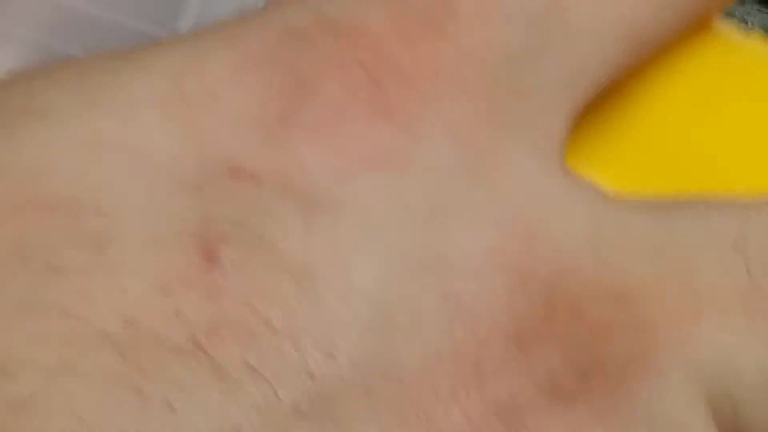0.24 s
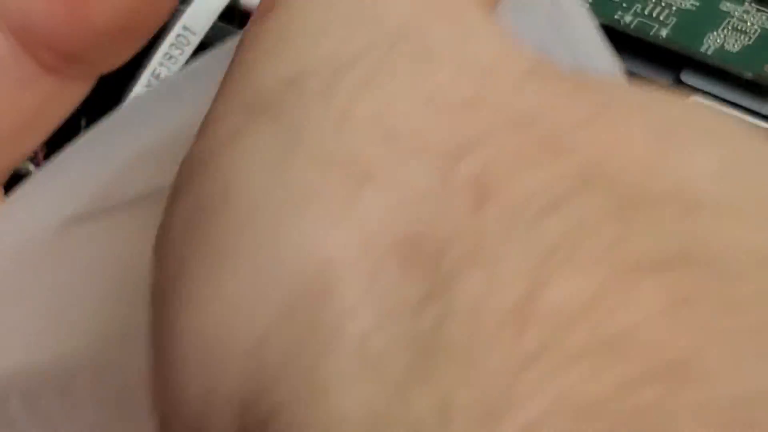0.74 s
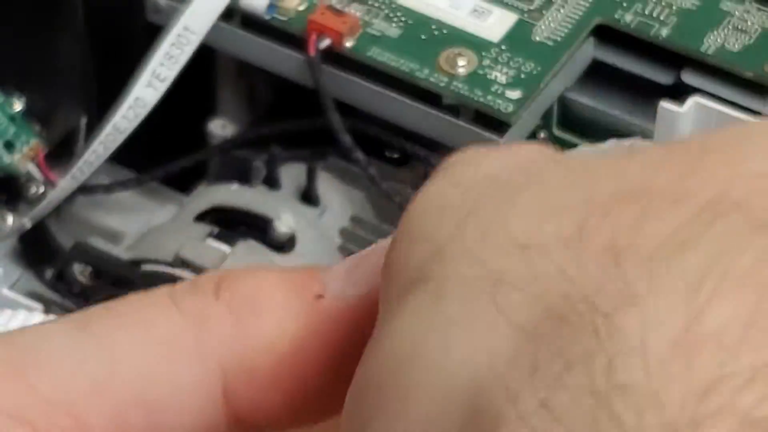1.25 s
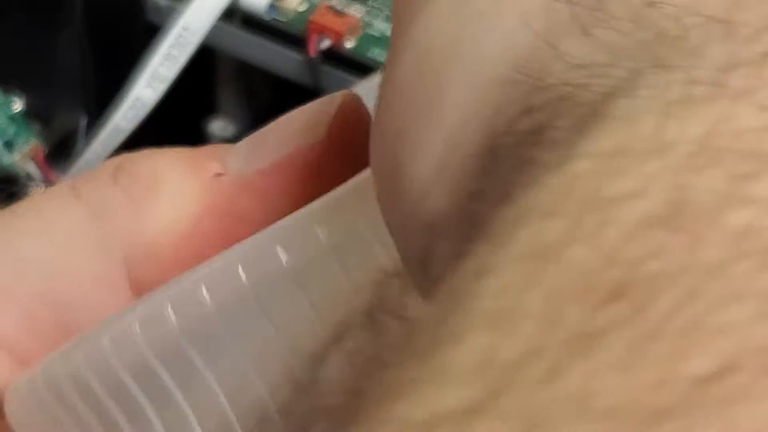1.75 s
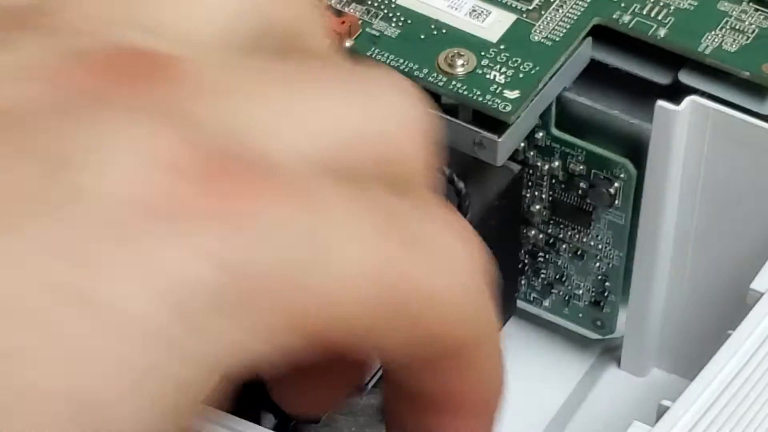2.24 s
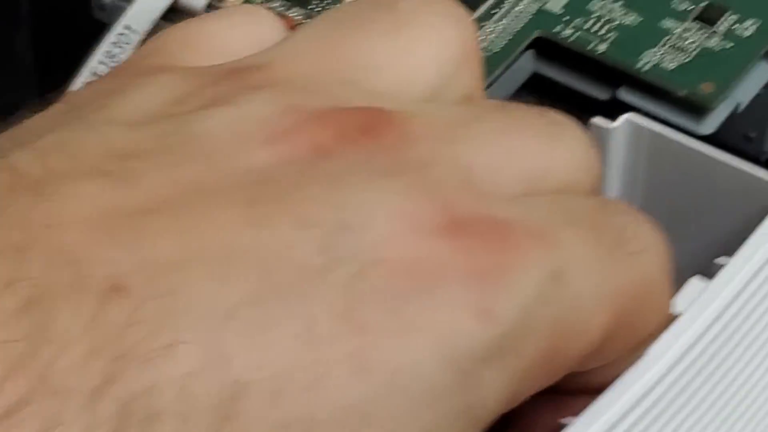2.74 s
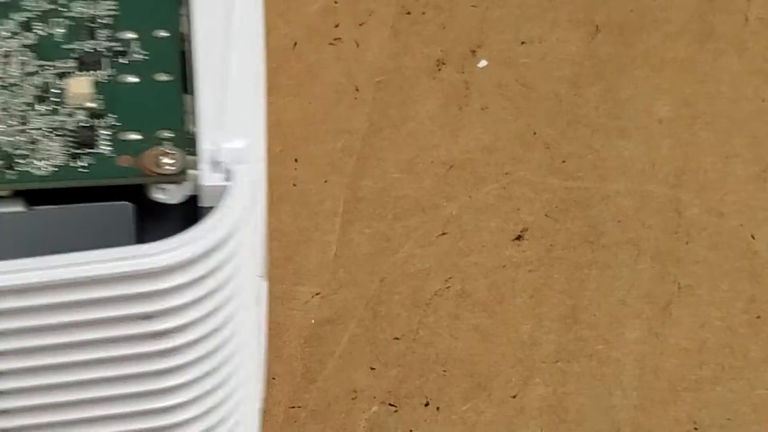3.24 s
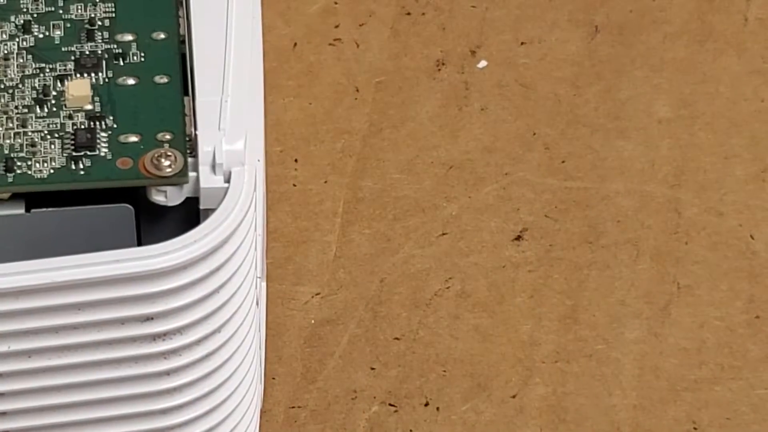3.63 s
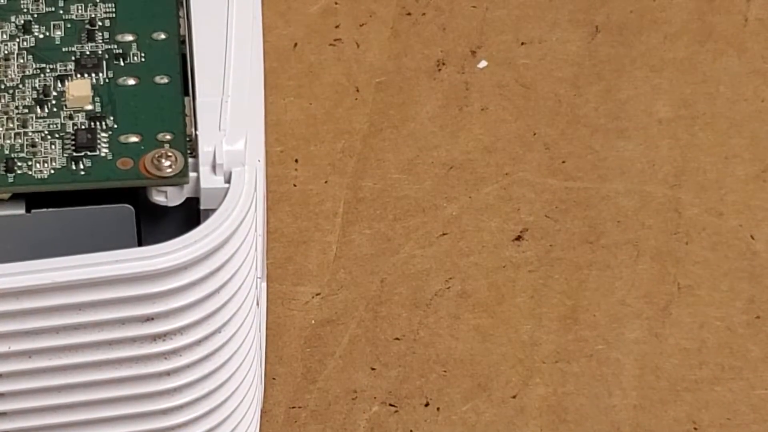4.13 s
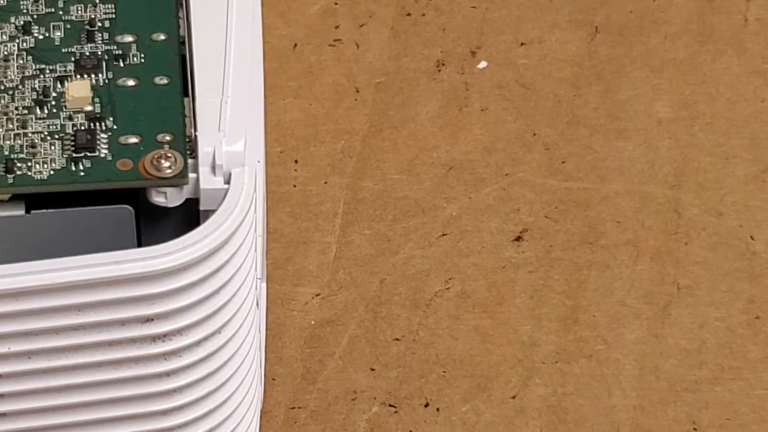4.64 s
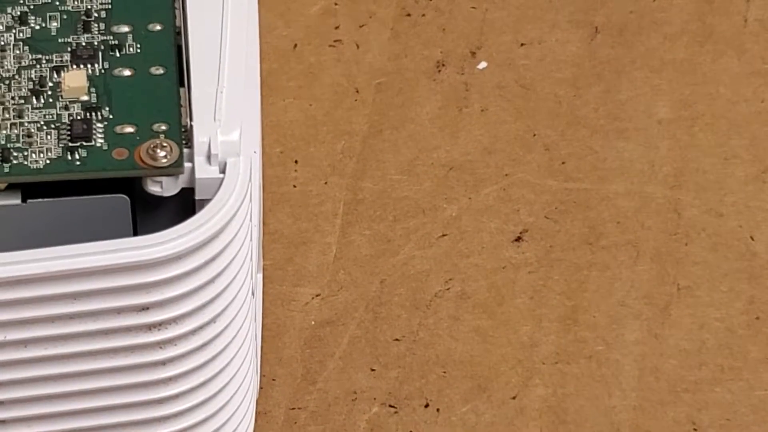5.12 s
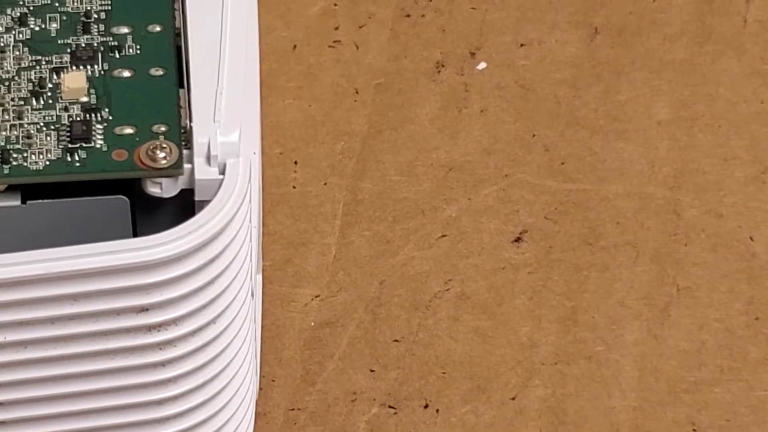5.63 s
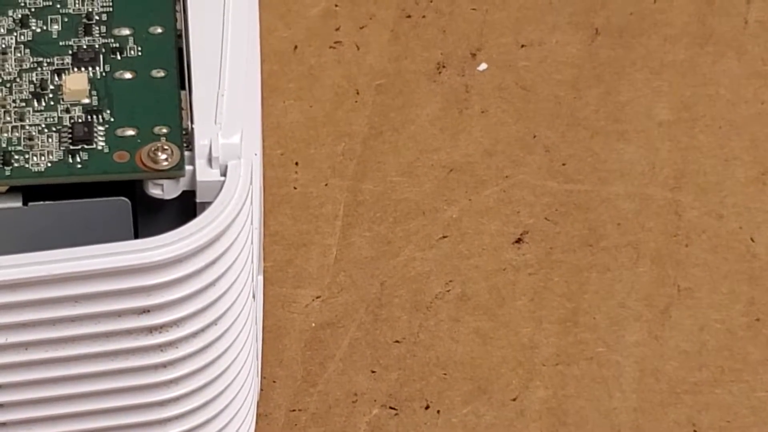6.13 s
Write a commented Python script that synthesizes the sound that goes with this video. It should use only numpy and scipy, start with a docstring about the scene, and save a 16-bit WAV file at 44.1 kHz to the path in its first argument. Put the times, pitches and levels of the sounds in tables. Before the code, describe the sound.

A squeezed plastic air blower puffs hissy bursts into an open electronics case, with plastic knocks and creaks over a low hum.

```python
"""A low machine hum and a faint hiss fill a small room. Close by, a plastic bellows blower puffs three
times deep into an open electronics case: each jet hisses over the parts, then the bellows draws air
back in more softly. Handled plastic scuffs, pops and creaks around the puffs, and a flurry of knocks
and fingertip taps follows in the pause. From 4.7 s four brighter puffs blow over the rim of the case,
with a few more knocks, while the hum sinks."""
import sys
import numpy as np
from scipy import signal
from scipy.fft import rfft, irfft
from scipy.io import wavfile
from scipy.ndimage import uniform_filter1d

SR = 44100
rng = np.random.default_rng(int(sys.argv[2]) if len(sys.argv) > 2 else 0)


def wrap_up_sound(samples):
    """Save the sound to the file named by the first command line argument, as 16-bit audio."""
    columns = np.atleast_2d(samples).T
    # keep every value between -1 and 1, then stretch to whole-number steps
    tamed = np.clip(columns, -1, 1)
    steps = np.round(tamed * 32767).astype(np.int16)
    wavfile.write(sys.argv[1], SR, steps)


N = 281137
TIME = np.arange(N) / SR
TOP_HZ = 15750  # upper edge of the sound
SHADE_HZ = 3000  # hand and case shade the treble of knocks and creaks above this


def undb(db):
    """Decibels to gain."""
    return 10 ** (np.asarray(db) / 20)


def rms(x):
    """Root mean square."""
    return np.sqrt(np.mean(x ** 2)) + 1e-12


def bins(size):
    """Frequencies of a spectrum of this many samples."""
    return np.maximum(np.fft.rfftfreq(size, 1 / SR), 1)


def colour(points, hz):
    """Read a (frequency [Hz], level [dB]) curve at these frequencies."""
    point_hz, db = np.transpose(points)
    return np.interp(np.log(hz), np.log(point_hz), db)


def causal(db, size):
    """Tightest pulse with this spectrum (minimum phase)."""
    cepstrum = irfft(np.log(undb(db)), size)
    cepstrum[1:size // 2] *= 2
    cepstrum[size // 2 + 1:] = 0
    return irfft(np.exp(rfft(cepstrum)), size)


def resonance(hz, centre_hz, q):
    """Response of one damped resonance, 1 at its centre."""
    return 1 / (1 + 1j * q * (hz / centre_hz - centre_hz / hz))


def walk(per_s):
    """Smooth random modulation of unit rms, with this many new values a second."""
    hold = int(SR / per_s)
    steps = np.repeat(rng.standard_normal(N // hold + 2), hold)
    slewed = uniform_filter1d(uniform_filter1d(steps, hold), hold)[:N]
    return slewed / rms(slewed)


def sides(pan_db):
    """Stereo gains for a pan, given as left minus right in dB."""
    return undb(np.vstack([pan_db, -pan_db]) / 2)


def add(out, s, sound):
    """Mix a stereo sound in at a time."""
    start = max(int(s * SR), 0)
    out[:, start:start + sound.shape[1]] += sound[:, :N - start]


def diffuse(size, wide_hz=600, bass_width=.12):
    """Stereo noise from all around: alike in the bass, unrelated in the treble."""
    hz = bins(size)
    mid, side = rfft(rng.standard_normal((2, size)))
    width = np.hypot(hz ** 2, bass_width * wide_hz ** 2) / np.hypot(hz ** 2, wide_hz ** 2)
    return irfft(np.array([mid + width * side, mid - width * side]) / np.sqrt(1 + width ** 2), size)


def steady(points, db):
    """Bed of diffuse noise with a given colour and rms level."""
    noise = irfft(rfft(diffuse(N)) * undb(colour(points, bins(N))), N)
    return undb(db) * noise / rms(noise)


def scatter(t60_s, size):
    """Dense fading reflections of unit energy, different on each side."""
    tail = diffuse(size) * undb(-60 * np.arange(size) / SR / t60_s)
    return tail / np.sqrt(np.sum(tail ** 2, axis=1, keepdims=True))


def machine_hum(waver_db=2.0, rumble_db=-35.5):
    """A machine drones in wavering low tones, the lowest two beating, over a rumble that swells along."""
    # tones of the machine: (frequency [Hz], rms level before the swell [dB], pitch wander [share])
    tones = [(52.5, -38, 0.0024), (59.54, -35, 0.01456), (107.05, -43.5, 0.0184), (119.1, -50, 0.00588),
             (171, -55.5, 0.0042)]
    # swell of the whole drone: (time [s], gain [dB])
    swell_curve = [(0, .5), (.95, 1.5), (1.3, -2), (2.3, -4), (2.85, 0), (4.1, 0), (4.8, -2.5), (5.3, -6),
                   (6.37, -6.3)]
    # colour of the rumble: (frequency [Hz], level [dB])
    rumble_colour = [(15, -50), (30, -30), (44, -11.5), (70, -8), (90, 0.5), (125, -9), (145, -22),
                     (250, -17), (350, -24.5), (700, -29), (2000, -60), (5000, -90)]
    swell = undb(np.interp(TIME, *np.transpose(swell_curve)))
    drone = 0
    for hz, db, wander in tones:
        phase = 2 * np.pi * np.cumsum(hz * (1 + wander * walk(9))) / SR
        drone += np.sqrt(2) * undb(db + waver_db * walk(10)) * np.sin(phase)
    return (drone + steady(rumble_colour, rumble_db)) * swell


def room_tone(level_db=-58.3):
    """The quiet, even hiss of the room."""
    # colour of the hiss: (frequency [Hz], level [dB])
    hiss_colour = [(200, 0), (500, -1), (1000, -6), (2000, -7), (4000, -8.5), (6300, -12.5), (8000, -18),
                   (15700, -17.5)]
    return steady(hiss_colour, level_db)


def stroke(attack_s, length_s, level_db, sag_db_per_s, release_db_per_s, ease_s=.009, size=16384):
    """Envelope of the air flow: it builds up, sags as the pressure is spent and dies away."""
    t = np.arange(size) / SR
    rise = np.sin(np.pi / 2 * np.minimum(t / attack_s, 1)) ** 3
    held_s = np.maximum(t - attack_s, 0)
    released_s = ease_s * np.logaddexp(0, (t - length_s) / ease_s)
    return rise * undb(level_db - sag_db_per_s * held_s - release_db_per_s * released_s)


def jet(flow, over_rim, tilt_db, cavity_hz, cavity_db, width_hz, rise_db_per_s,
        scatter_db=3, swing_s=.18, glide=.12, flap_db=2, flutter_db=1.35):
    """Turbulent air at the nozzle, coloured by the cavity it hits and scattered by the parts around."""
    # hiss deep inside the case: (frequency [Hz], level [dB])
    inside_colour = [(120, -38), (220, -16), (400, -7.5), (600, 0), (1000, -5.5), (1350, 5.5), (1900, 3),
                     (2450, 1.5), (3100, 3), (4300, 1), (5300, -3.5), (6500, -2.5), (8000, -9.5),
                     (9500, -5), (11700, -3), (15700, -13)]
    # stereo balance of that hiss: (frequency [Hz], left minus right [dB])
    inside_pan = [(200, 7), (700, 13.5), (1300, 1.5), (4400, 1), (15000, -1)]
    # hiss over the rim: (frequency [Hz], level [dB])
    rim_colour = [(120, -61), (200, -60), (327, -43), (393, 8), (517, 3), (643, 10), (1030, 6), (1290, 6.5),
                  (1440, -0.5), (2110, 3.5), (3300, -3.5), (4400, 5), (6700, 3), (7800, 0), (9500, 3),
                  (12700, 3), (14200, -2.5), (15700, -14.5)]
    size = len(flow)
    hz, t = bins(size), np.arange(size) / SR
    if over_rim:
        shape_db, pan_db = colour(rim_colour, hz), 2.5
        sizzle_hz, sizzle_db = 14900, 12
        lag_s = np.array([[0], [1.35e-4]])  # the nearer side hears the jet first
    else:
        shape_db, pan_db = colour(inside_colour, hz), colour(inside_pan, hz)
        sizzle_hz, sizzle_db = 15000, 13
        lag_s = np.array([[7e-5], [0]])
    shape_db += tilt_db * np.log2(np.clip(hz, 500, TOP_HZ) / 1000)
    shape_db += sizzle_db * np.exp(-((hz - sizzle_hz) / 1600) ** 2)  # the narrow nozzle sizzles
    paths = np.exp(-2j * np.pi * hz * lag_s) + undb(scatter_db) * rfft(scatter(t60_s=.07, size=size))
    eddies = rfft(diffuse(size))  # further along the jet, they hiss on their own
    air = (rfft(rng.standard_normal(size)) * paths + eddies) * undb(shape_db) * sides(pan_db)
    treble = irfft(air.mean(axis=0) * (hz > 9000) * (hz < TOP_HZ))  # the flow sets this band's level
    # the cavity glides up, and sings more or less, as the nozzle swings towards it or away
    from_mid_s = np.minimum(t, swing_s) - swing_s / 2
    early, late = (irfft(air * np.exp(-2 * ((hz - centre_hz) / width_hz) ** 2))
                   for centre_hz in (cavity_hz * (1 - glide / 2), cavity_hz * (1 + glide / 2)))
    cavity = early + (late - early) * (from_mid_s / swing_s + .5)
    flapping_db = flap_db * walk(35)[:size]  # the jet flaps across the cavity's mouth
    boost_db = cavity_db + rise_db_per_s * from_mid_s + flapping_db
    hiss = irfft(air) + cavity * (undb(boost_db) - 1)
    return hiss / rms(treble) * flow * undb(flutter_db * walk(80)[:size])


def bellows(over_rim_from_s=4, pause_s=.056):
    """Each squeeze blows a puff; the bellows springs back and draws a softer breath through the nozzle."""
    # squeezes: (time [s], attack [s], length [s], treble level [dB], sag [dB/s], tilt [dB/octave],
    # cavity note [Hz], cavity boost [dB], cavity width [Hz], cavity rise [dB/s],
    # refill length [s], refill treble level [dB], refill tilt [dB/octave])
    squeezes = [ (0.243, .078, .135, -35.7, 35, -1.8, 2950, 6.5, 500, 40, .1, -46.5, 0),
                (1.103, 0.023, 0.13, -22.5, 20, 2, 3500, -0.5, 900, 19, 0.11, -48.5, 4),
                (1.629, 0.078, 0.18, -38, 45, -0.9, 2970, -0.5, 910, -5, 0.064, -46, -0.5),
                (4.684, 0.077, 0.22, -23, 90, 4.5, 5150, -0.5, 1600, 4, 0.1, -45.5, 5),
                (5.2, 0.064, 0.15, -22.3, 10, 5, 5400, 2, 1200, 65, 0.15, -45.5, 5),
                (5.645, 0.055, 0.135, -22.5, 135, 4, 5200, 4.5, 1200, -16, 0.11, -49, 3),
                (6.052, 0.071, 0.14, -24, 117, 2.5, 5260, 5, 1300, 10, .17, -53, 3.5)]
    out = np.zeros((2, N))
    for s, attack_s, length_s, db, sag, tilt, *cavity, refill_s, refill_db, refill_tilt in squeezes:
        over_rim = s > over_rim_from_s
        puff = stroke(attack_s, length_s, db, sag, release_db_per_s=315)
        add(out, s, jet(puff, over_rim, tilt, *cavity))
        refill = stroke(.07, refill_s, refill_db, sag_db_per_s=0, release_db_per_s=150)
        breath = jet(refill, over_rim, refill_tilt,
                     cavity_hz=5230, cavity_db=4.5, width_hz=4000, rise_db_per_s=0)
        add(out, s + length_s + pause_s, breath)
    return out


def scuffs(grain_db=2.5):
    """Skin catches and slips on the plastic in short, grainy swells."""
    # finger slides: (centre time [s], length [s], level [dB])
    slides = [(0.462, 0.042, -45), (3.47, 0.06, -51), (3.862, 0.08, -51), (4.2, 0.15, -56)]
    # muffled colour of the friction: (frequency [Hz], level [dB])
    friction_colour = [(200, -12), (720, 0), (1300, -6), (2500, -8), (4500, -15), (7000, -22), (9000, -31),
                       (15000, -36)]
    swell = sum(undb(db) * np.exp(-2 * ((TIME - s) / length_s) ** 2) for s, length_s, db in slides)
    return swell * undb(grain_db * walk(280)) * steady(friction_colour, 0)


def shell_ring(hz, t, strike_db, detune_share=.0084, stereo_spread=.16):
    """The plastic shell rings; every place that is struck drives its modes differently."""
    # modes of the shell: (frequency [Hz], level [dB], time to fall 60 dB [s])
    shell_modes = [(175, -20, .2), (212, -14, .18), (257, -18, .2), (399, -9, .17), (430, -11, .25),
                   (620, -6, .07), (830, -7, .1), (1315, -3, .1), (1430, -2, .12), (1600, -1, .09),
                   (1700, -2, .09), (1960, 3, .055), (2240, 4, .05)]
    mode_hz, mode_db, t60_s = np.transpose(shell_modes)[:, :, None]
    detune = 1 + detune_share * rng.standard_normal(mode_hz.shape)
    drive_db = mode_db + np.interp(mode_hz, hz, strike_db)
    modes = undb(drive_db - 60 * t / t60_s) * np.sin(2 * np.pi * mode_hz * detune * t)
    polarity = rng.choice([-1, 1], len(modes))
    ring = (polarity + stereo_spread * rng.standard_normal((2, len(modes)))) @ modes
    return np.sqrt(2) * ring / np.linalg.norm(ring)


def knocks(thud_hz=450, snap_hz=3500, note_octaves=.25, note_cycles=26,
           rattle_db=2, rattle_top_hz=5000, shell_db=-5.5, hollow_db=-4, size=16384):
    """Each blow is a sharp pulse, a brief rattle in the case, the shell's ring and a hollow wall note."""
    # pops and knocks of plastic: (time [s], relative level [dB], thud [dB], snap [dB], ring [dB],
    # note [Hz], note boost [dB], left minus right [dB])
    blows = [ (0.511, -24, 3, 12, -1.5, 800, 13, 4.5), (0.748, -38.5, 4, 3, 4, 820, 10, 5.5),
             (0.787, -45, 6, 0, 4, 744, 11, 6), (0.985, -55, -20, 15, -7, 4300, 5, 13),
             (0.990, -46, 22, -15, -5, 230, 8, 2), (1.11, -19, 16, 27, -2, 4300, 5, 1.5),
             (1.688, -39, 12, -4, 8, 696, 13, 3), (2.325, -51, -3, 5, 10, 720, 6, 3.5),
             (3.348, -20, 4.5, -6, -6, 900, 2, 4.5), (3.363, -41, 0, -15, 11, 2150, 3, 1),
             (3.536, -18, 13.5, -1, -1.5, 1484, 5, 3.5), (3.541, -26.5, 3, -17, 5.5, 1620, 4, -2),
             (3.556, -36, -3, -18, 11, 1750, 5, 0), (3.605, -27, 13, -6, 1.5, 1330, 5, 3),
             (3.615, -34.5, 18, -3, 10, 1420, 7, 2), (4.112, -27.5, 8.5, -14, -4.5, 2270, 5, -2),
             (4.428, -21.5, 6, -8, -4, 2080, 3, 0.5), (5.123, -34, 5, -12, -3, 1500, 2, 1),
             (5.256, -35.5, -7, -30, -15, 1550, 5, 3), (5.555, -46, -15, 10, -5, 4000, 10, 2),
             (5.598, -41, 7, 1, -2, 770, 5, 2), (5.652, -23.5, -2, -8, -6, 1940, 4, 5),
             (6.062, -22, 1.5, 0.5, -5.5, 1480, 4, 4)]
    # soft fingertip taps on the case: (time [s], relative level [dB], note [Hz])
    fingertips = [(3.480, -38.5, 1150), (3.513, -43, 800), (3.835, -42, 1200), (3.902, -45, 1000),
                  (4.276, -41, 660), (4.300, -41, 1550), (4.352, -46, 900)]
    # basic colour of an impact: (frequency [Hz], level [dB])
    impact_colour = [(80, -40), (150, -6.5), (310, -9), (630, -3), (1070, -7.5), (1500, -4.5), (2300, -2.5),
                     (2750, -11.5), (4000, -10.5), (6500, -19.5), (9000, -30), (15000, -27)]
    taps = [(s, db, 14, -43, -3, note_hz, 3, 1) for s, db, note_hz in fingertips]  # all equally dull
    out, hz, t = np.zeros((2, N)), bins(size), np.arange(size) / SR
    lag = np.exp(-2j * np.pi * hz * np.array([[0], [1e-4]]))  # the right side hears it 0.1 ms later
    fade = 1 - (t / t[-1]) ** 2
    for s, db, thud_db, snap_db, ring_db, note_hz, note_db, pan_db in blows + taps:
        strike_db = thud_db / (1 + (hz / thud_hz) ** 4) + snap_db / (1 + (snap_hz / hz) ** 4)
        strike_db += note_db * np.exp(-(np.log2(hz / note_hz) / note_octaves) ** 2)
        pulse = causal(colour(impact_colour, hz) + strike_db, size)
        spectrum = rfft(pulse / np.linalg.norm(pulse))
        direct = irfft(spectrum * lag / (1 + 1j * hz / SHADE_HZ))
        rattle = irfft(spectrum * rfft(scatter(t60_s=.1, size=size)) / (1 + 1j * hz / rattle_top_hz))
        shell = shell_ring(hz, t, strike_db)
        hollow = undb(-60 * t * note_hz / note_cycles) * np.sin(2 * np.pi * note_hz * t)
        hollow /= np.linalg.norm(hollow)
        ring = undb(rattle_db) * rattle + undb(shell_db) * shell + undb(hollow_db) * hollow
        blow = direct + undb(ring_db) * ring
        add(out, s + .00113, blow * fade * undb(db) * sides(pan_db))
    return out


def creaks(slips_per_s=1600, q=7, wall_hz=2100, wall_db=-7, pan_db=3, size=4096):
    """A fold of the bellows gives way in a quick run of slips that ring its hollow body."""
    # folds giving way: (centre time [s], length [s], level [dB], note [Hz])
    folds = [(1.700, .014, -35, 700), (1.943, .018, -41, 760), (2.334, .012, -48, 720),
             (2.485, .012, -47, 1800), (3.065, .018, -41, 760), (3.125, .028, -42, 780)]
    out, hz, t = np.zeros((2, N)), bins(size), np.arange(size) / SR
    for s, length_s, db, note_hz in folds:
        slips = (rng.random(size) < slips_per_s / SR) * rng.standard_normal(size)
        slips *= np.exp(-2 * (t / length_s - 2) ** 2)
        body = resonance(hz, note_hz, q) + undb(wall_db) * resonance(hz, wall_hz, q)
        paths = 1 + rfft(scatter(t60_s=.06, size=size))
        creak = irfft(rfft(slips) * body * paths / (1 + 1j * hz / SHADE_HZ))
        creak /= rms(creak) * np.sqrt(t[-1] / length_s)
        add(out, s - 2 * length_s, creak * undb(db) * sides(pan_db))
    return out


def room(x, wet_db, low_t60_s=.3, high_t60_s=.22, split_hz=4000, build_s=.01, size=22050):
    """Echoes of a small room build up quickly; the treble dies first."""
    low = 1 / (1 + (bins(size) / split_hz) ** 2)
    tail = irfft(rfft(scatter(low_t60_s, size)) * low + rfft(scatter(high_t60_s, size)) * (1 - low))
    tail *= 1 - np.exp(-(np.arange(size) / SR / build_s) ** 2)
    echoes = signal.fftconvolve(x.mean(axis=0, keepdims=True), tail, axes=1)[:, :N]
    return x + undb(wet_db) * echoes


def scene(knock_gain_db=27):
    """Fairly dry puffs and roomier handling noises over the hum and the room tone."""
    handling = undb(knock_gain_db) * knocks() + creaks() + scuffs()
    return room(bellows(), wet_db=-15) + room(handling, wet_db=-6.5) + machine_hum() + room_tone()


def record(dry):
    """A phone's steep low-pass cuts the very top."""
    return signal.sosfilt(signal.ellip(10, .2, 70, TOP_HZ, fs=SR, output="sos"), dry)


dry = scene()
out = record(dry)
wrap_up_sound(out)
```